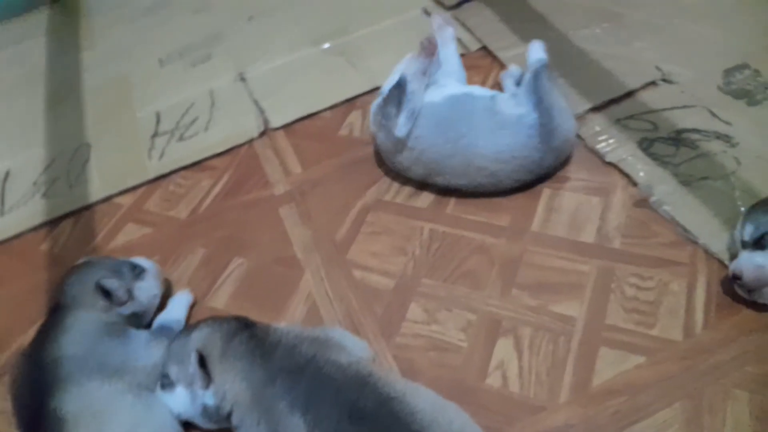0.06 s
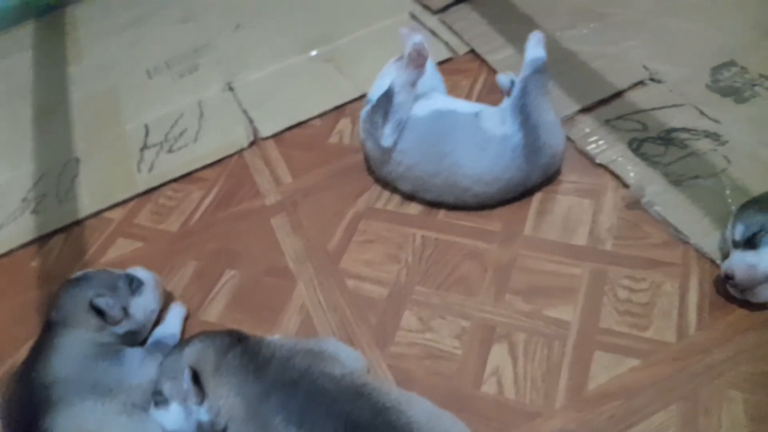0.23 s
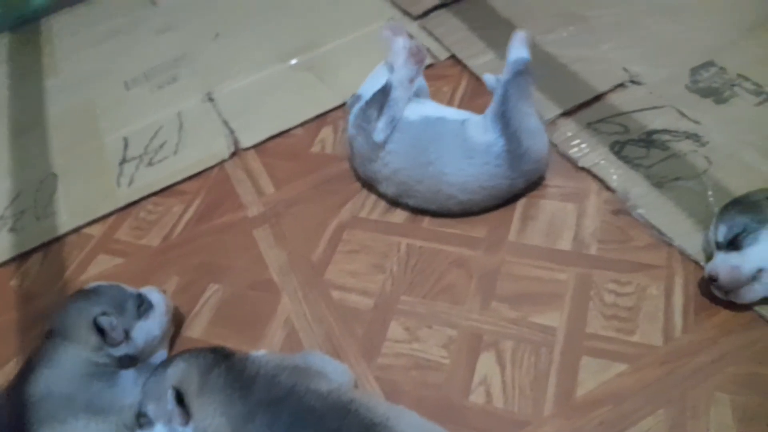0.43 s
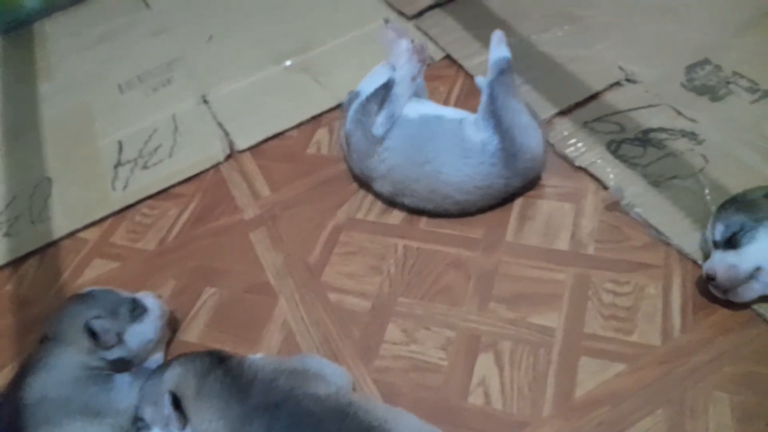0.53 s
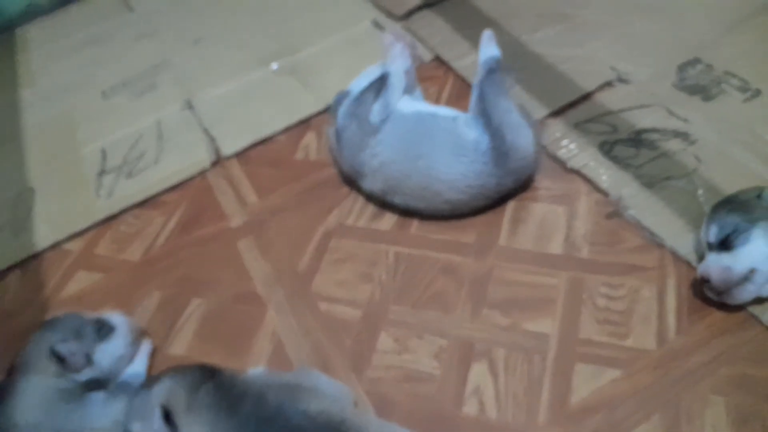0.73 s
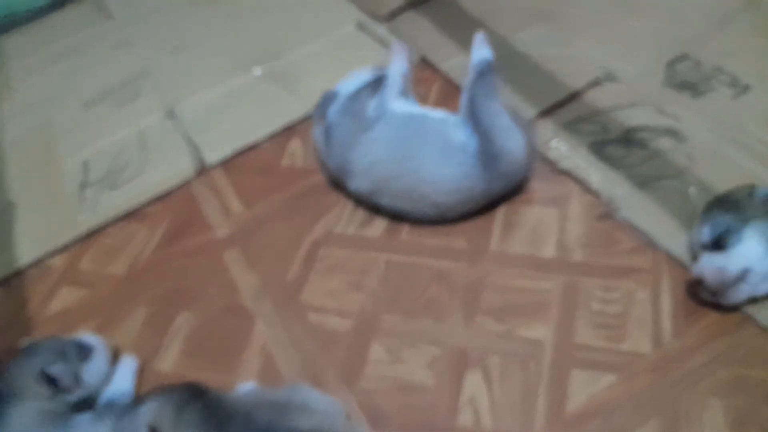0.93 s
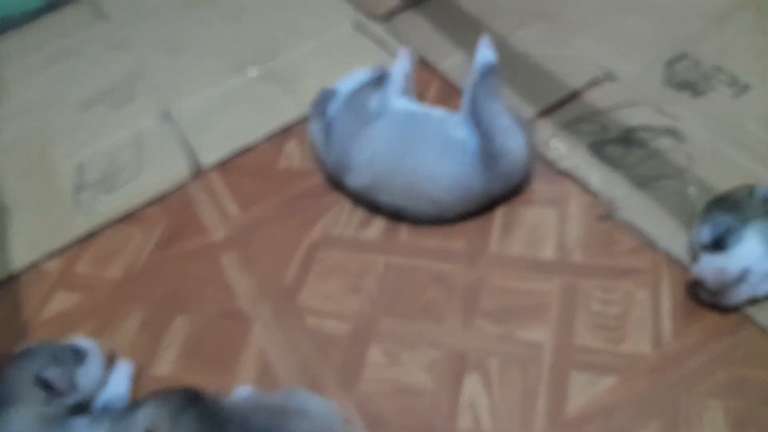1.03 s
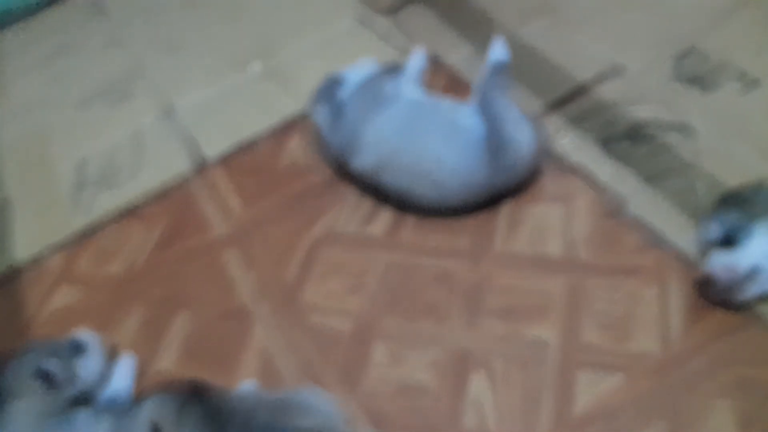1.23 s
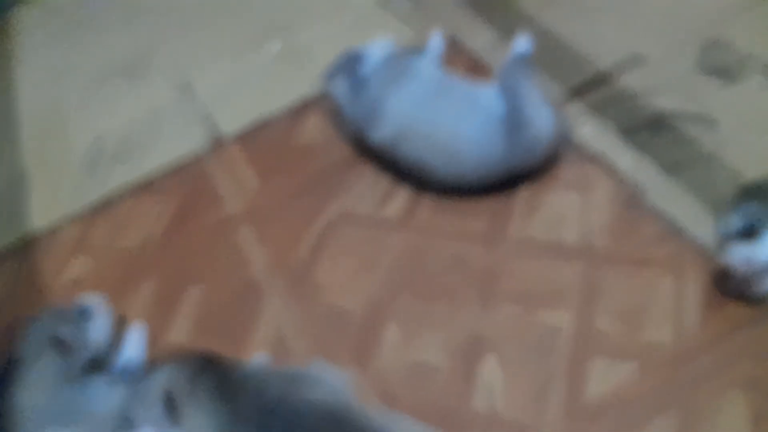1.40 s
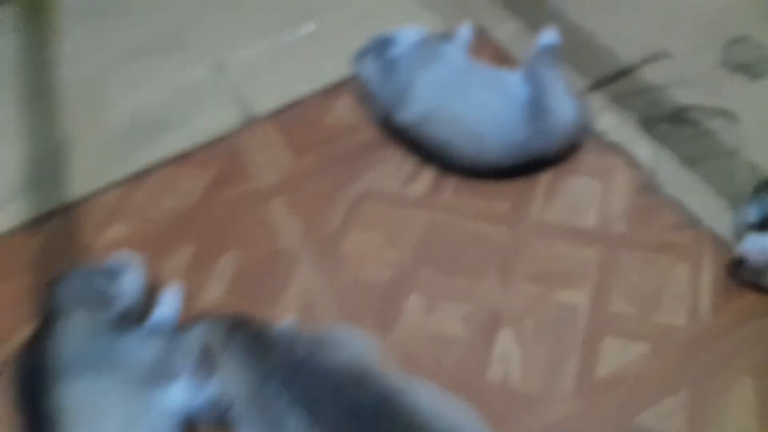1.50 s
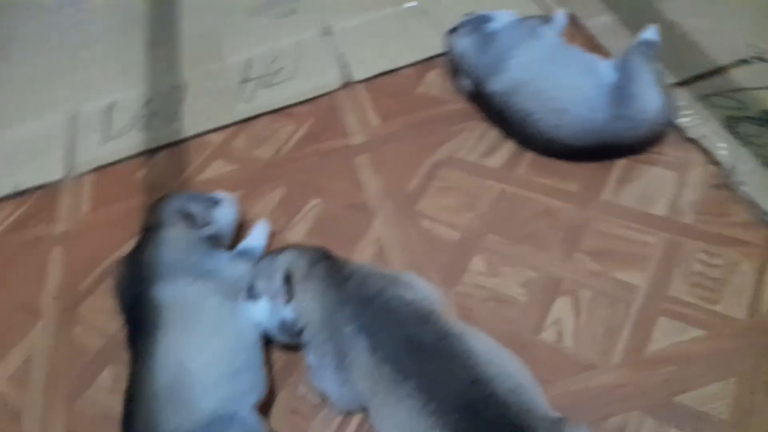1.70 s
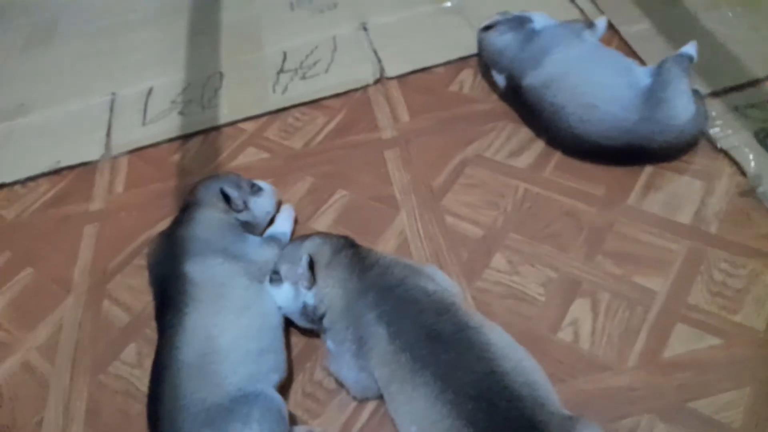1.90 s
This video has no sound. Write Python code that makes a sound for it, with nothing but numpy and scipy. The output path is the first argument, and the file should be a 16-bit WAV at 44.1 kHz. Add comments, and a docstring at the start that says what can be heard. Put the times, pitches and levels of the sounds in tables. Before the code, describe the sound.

Two quick puppy squeaks, each swooping up then dropping, the second shorter; close, lively room echo, faint soft thumps and rustles, and a constant wavering fan wash picked up by a simple stereo handheld microphone.

```python
"""A small, hard-walled room, where a puppy on the floor yelps twice in its sleep.
Each yelp is a stack of harmonics that sweeps up, tops out and sags, over a thin, bright hiss.
Faint puffs, soft bumps and rustles, and a low swell of the moving air near the end are bands of noise.
The room rings on after them all, while a fan adds wavering hum tones and a wash of coloured noise.
A gain control turns loud sound down fast and recovers slowly."""
import sys
import numpy as np
from scipy import signal
from scipy.fft import rfft, irfft
from scipy.io import wavfile
from scipy.ndimage import uniform_filter1d, minimum_filter1d

SR = 44100
rng = np.random.default_rng(int(sys.argv[2]) if len(sys.argv) > 2 else 0)


def int16_out(signal):
    """Quantize to a 16-bit WAV file."""
    q = np.round(np.clip(np.atleast_2d(signal).T, -1, 1) * 32767)
    wavfile.write(sys.argv[1], SR, q.astype(np.int16))


N = 85995  # length of the scene [samples]


def amp(db):
    """Turns decibels into a gain."""
    return 10 ** (np.asarray(db) / 20)


def unit(x):
    """Scales a sound to an rms level of one."""
    return x / np.sqrt(np.mean(x ** 2) + 1e-20)


def read(points, hz):
    """Reads a table between its points, with frequency on a log scale as in hearing."""
    table_hz, value = np.transpose(points)
    return np.interp(np.log(hz + 1), np.log(table_hz + 1), value)


def bins(x):
    """Lists the frequencies in a signal's spectrum [Hz]."""
    return np.fft.rfftfreq(x.shape[-1], 1 / SR)


def colour(x, points):
    """Makes each frequency louder or softer by a table of (frequency [Hz], level [dB])."""
    gain = amp(read(points, bins(x)))
    return irfft(rfft(x) * gain, x.shape[-1])


def drift(size, rate_hz):
    """Makes smooth random motion by fading out noise faster than about the given rate."""
    spectrum = rfft(rng.standard_normal(N))
    hz = np.fft.rfftfreq(N, 1 / SR)
    slow = irfft(spectrum * np.exp(-(hz / rate_hz) ** 2), N)
    return unit(slow)[:size]


def band(size, edges_hz):
    """Makes noise that lies mostly between two frequencies."""
    edges_hz = np.clip(np.sort(edges_hz), 20, SR / 2 - 1)
    sos = signal.butter(2, edges_hz, "band", fs=SR, output="sos")
    noise = signal.sosfilt(sos, rng.standard_normal(N))
    return unit(noise[-size:])


def add(mix, start_s, sound):
    """Mixes a sound in from a given time, cut off at the end of the mix."""
    first = max(round(start_s * SR), 0)
    part = mix[first:][:len(sound)]
    part += sound[:len(part)]


def yelp(curve, slope_db_per_oct):
    """Gliding vocal-fold harmonics pass through throat and mouth, with a rasp and a thin, bright hiss."""
    # what throat and mouth let through: (frequency [Hz], level [dB])
    throat = [(300, -36), (560, -11.5), (750, -5.5), (950, -8.5), (1060, 3), (1170, 1.5), (1300, -1.5),
              (1550, -5), (1900, -6), (2400, -9), (3050, -17), (3500, -26), (4300, -43), (5800, -31.5),
              (7500, -42)]
    # colour of the rasp: (frequency [Hz], level [dB])
    rasp_colour = [(300, -34), (600, -11), (1100, 1), (1700, 4), (2900, -10.5), (3700, -18), (8000, -34)]
    # throat turbulence against the note, stronger at low pitch: (pitch [Hz], level [dB])
    rasp_by_pitch = [(580, -13), (700, -16), (800, -21), (950, -25)]
    # colour of the thin hiss: (frequency [Hz], level [dB])
    hiss_colour = [(2000, -27), (4500, 3), (6000, -6), (8500, -7), (12500, 3), (15500, -10)]
    voice_db, hiss_db = -11.5, -38  # the hiss is set before the voice level
    jitter, jitter_hz = .011, 330  # pitch tremor: rms share of the pitch, and its speed
    edge_s = 0.0075  # fade at the start and stop of the voice

    s, *controls = np.transpose(curve)
    t = np.arange(s[0], s[-1], 1 / SR)
    pitch_hz, effort_db, mouth_db = (np.interp(t, s, values) for values in controls)
    hz = pitch_hz * (1 + jitter * drift(len(t), jitter_hz))
    phase = 2 * np.pi * np.cumsum(hz) / SR

    orders = np.arange(1, 9)[:, None]
    # the fundamental is left alone; the overtones follow the mouth and the slope
    overtone_db = (orders > 1) * (mouth_db + slope_db_per_oct * np.log2(orders / 2))
    harmonic_gain = amp(read(throat, orders * hz) + overtone_db)
    note = (harmonic_gain * np.sin(orders * phase)).sum(0)

    # the rasp swells once in every cycle of the vocal folds
    pulsed_noise = rng.standard_normal(N)[:len(t)] * (1 + np.cos(phase))
    rasp = unit(colour(pulsed_noise, rasp_colour))
    voice = amp(effort_db) * (note + amp(read(rasp_by_pitch, pitch_hz)) * rasp)

    hiss = amp(hiss_db) * unit(colour(rng.standard_normal(N), hiss_colour))[:len(t)]
    hiss = hiss * np.hanning(len(t)) ** .5
    gate = np.clip(np.minimum(t - s[0], s[-1] - t) / edge_s, 0, 1)
    return s[0], gate * amp(voice_db) * (voice + hiss)


def puff(start_s, length_s, db):
    """Air through the puppy's nose is a faint band of noise that swells and fades."""
    size = round(length_s * SR)
    return start_s, np.hanning(size) * amp(db) * band(size, (3700, 6500))  # band edges [Hz]


def stir(start_s, length_s, low_db, high_db):
    """A bump, rustle or swell of air is a low and a higher noise band that swell and fade together."""
    size = round(length_s * SR)
    low = amp(low_db) * band(size, (120, 312))  # band edges [Hz]
    high = amp(high_db) * band(size, (600, 5840))
    return start_s, np.hanning(size) * (low + high)


def room(x, echoes):
    """At one microphone, hard walls add near reflections, a dense fading tail and ringing resonances."""
    # how long the tail takes to fade by 60 dB: (frequency [Hz], time [s])
    fade_times = [(150, 0.26), (700, 0.42), (980, 0.45), (1100, 0.51), (1220, 0.12), (1400, 0.52),
                  (1900, 0.43), (3000, 0.41), (6000, 0.34), (14000, 0.33)]
    # narrow resonances: (frequency [Hz], level against the tail [dB], time to fade by 60 dB [s])
    modes = [(941, -30, 0.59), (1551, -32, .62), (1880, -27.5, 0.54)]
    room_db, build_s = 4.5, 0.0071  # tail energy against the direct sound; time the tail takes to build up

    # the tail is noise in which each frequency fades at its own speed
    hz, t, spectrum = signal.stft(rng.standard_normal(SR), SR, nperseg=256)
    decay = amp(-60 * t / read(fade_times, hz)[:, None])
    build = 1 - np.exp(-t / build_s)
    tail = unit(signal.istft(spectrum * decay * build, SR)[1])

    t = np.arange(len(tail)) / SR
    for mode_hz, db, t60 in modes:
        tone = np.sin(2 * np.pi * (mode_hz * t + rng.random()))
        ring = tone * np.exp(-np.log(1000) * t / t60)
        tail = tail + amp(db) * unit(ring)

    response = amp(room_db) * tail / np.linalg.norm(tail)
    response[0] += 1  # the direct sound
    for delay_s, gain in echoes:
        add(response, delay_s, np.array([gain]))
    return signal.fftconvolve(x, response)[:N]


def fan():
    """A fan gives low hum tones that waver in strength and phase, in a wash of moving air and hiss."""
    # hum tones: (frequency [Hz], level [dB])
    hum_tones = [(73, -54), (149, -45.5), (222, -59.5), (292, -54)]
    # colour of the air noise: (frequency [Hz], level [dB per Hz])
    air_colour = [(25, -44), (45, -22), (68, -11), (110, -12), (170, -7), (300, -8.5), (450, -10.5),
                  (800, -8.5), (1250, -12), (2600, -19.5), (4000, -28.5), (6800, -29), (8200, -36),
                  (12500, -32.5), (15000, -39)]
    # how alike the air noise is at left and right: (frequency [Hz], likeness [0-1])
    air_same = [(100, 0.83), (300, .7), (700, 0.74), (1500, 0.13), (5000, 0), (12000, 0.03)]
    waver = .4  # rms, as a share of the strength and as a phase [radians]
    air_db = -38

    t = np.arange(N) / SR
    hum = np.zeros(N)
    for hz, db in hum_tones:
        strength = 1 + waver * drift(N, 2)
        tone = np.sin(2 * np.pi * hz * t + waver * drift(N, 1.7))
        hum += amp(db) * unit(strength * tone)

    # the right side mixes the left side's noise with noise of its own
    left, other = rfft(rng.standard_normal((2, N)))
    same = np.clip(read(air_same, bins(t)), 0, 1)
    right = same * left + np.sqrt(1 - same ** 2) * other
    air = unit(colour(irfft(np.array([left, right]), N), air_colour))
    level_db = air_db + .5 * drift(N, 24)  # a slight flutter
    return hum + air * amp(level_db)


def scene():
    """The puppy, the soft bumps and rustles and the swell of air sound in the room, over the fan."""
    # the yelps: (time [s], pitch [Hz], effort [dB], mouth opening as overtone gain [dB])
    first_yelp = [(.240, 541.6, -11, 7), (.247, 573.7, -7.5, 3.5), (.256, 600, 2.5, 5.5),
                  (.264, 680.4, -1, -2.5), (.280, 766, -1.5, 6), (.292, 922.3, 0, 0.5),
                  (.316, 968, 2.5, -6), (.328, 770.7, -7.5, -3.5), (.355, 652, -9.5, 3)]
    second_yelp = [(1.160, 633.5, 1, -7), (1.169, 675.5, -4.5, 0.5), (1.182, 748.6, -3.5, 6),
                   (1.201, 803.7, 3, 2.5), (1.212, 913, 1.5, 3), (1.220, 981, 4.5, -1),
                   (1.232, 960, 0.5, -0.5), (1.24, 741, -7, 3), (1.253, 597, -8.5, -10.5),
                   (1.274, 596, -14, -16)]
    # puffs of air late in each yelp: (time [s], length [s], level [dB])
    puffs = [(0.329, .08, -47), (1.241, .08, -43.5)]
    # soft bumps and rustles, and last a low swell of the moving air:
    # (time [s], length [s], low band level [dB], higher band level [dB])
    stirs = [(.17, .1, -43, -53), (0.463, .028, -28.5, -52.5), (.518, .04, -42.5, -64),
             (0.75, 0.066, -62, -54.5), (1.76, .16, -46, -56.5)]
    # near reflections at each microphone: (delay [s], gain [ratio])
    left_echoes = [(.0021, .3), (.0068, .3), (0.0131, -.25)]
    right_echoes = [(.0014, -.4), (.0052, .4), (.0153, .45)]

    dry = np.zeros(N)
    # the slope sets how fast harmonics above the second weaken [dB per octave]
    add(dry, *yelp(first_yelp, slope_db_per_oct=-8.5))
    add(dry, *yelp(second_yelp, slope_db_per_oct=-5.5))
    for row in puffs:
        add(dry, *puff(*row))
    for row in stirs:
        add(dry, *stir(*row))
    return np.array([room(dry, left_echoes), room(dry, right_echoes)]) + fan()


def record(dry):
    """Unequal microphones feed a slowly recovering gain control, a peak limiter and a treble cutoff."""
    # right microphone's added colour: (frequency [Hz], level [dB])
    right_lead = [(70, 5.5), (200, -0.34), (700, 2), (1200, 0), (1600, 4), (2200, 6.5), (4000, 8),
                  (8000, 3.06), (14000, -1.5)]
    limit_db, limit_share = -12, 0.69  # where turning down begins; share of the excess taken away
    fall_db_per_s = 0.6  # how fast the remembered loudest level falls
    ceiling, cutoff_hz = .97, 15400  # the ceiling is for peaks going into the treble cutoff

    x = np.array([dry[0], colour(dry[1], right_lead)])

    # the gain control remembers the loudest level and lets it fall slowly
    power = uniform_filter1d((x ** 2).mean(0), size=600)
    power_db = 10 * np.log10(abs(power) + 1e-12)
    fall_db = np.arange(N) / SR * fall_db_per_s
    held_db = np.maximum.accumulate(power_db + fall_db) - fall_db
    over_db = np.maximum(held_db - limit_db, 0)
    x = x / amp(limit_share * uniform_filter1d(over_db, size=200))

    # the limiter dips smoothly around each peak above the ceiling
    peak_gain = ceiling / np.maximum(abs(x), ceiling)
    x = x * uniform_filter1d(minimum_filter1d(peak_gain, size=181), size=181)

    lowpass = signal.firwin(511, cutoff_hz, window=("kaiser", 9), fs=SR)
    return signal.oaconvolve(x, lowpass[None], "same")


dry = scene()
out = record(dry)
int16_out(out)
```